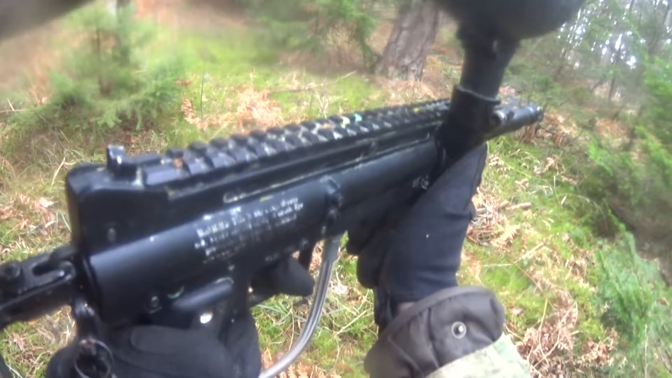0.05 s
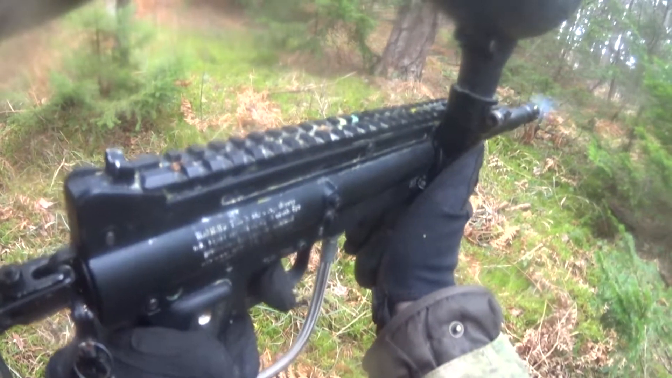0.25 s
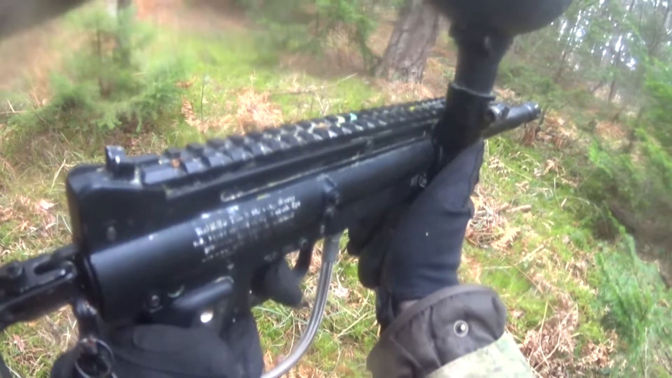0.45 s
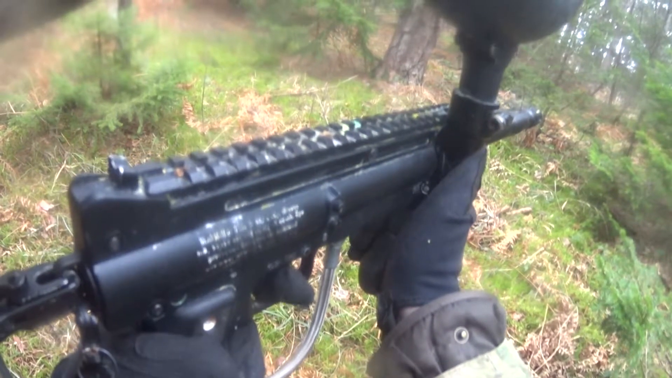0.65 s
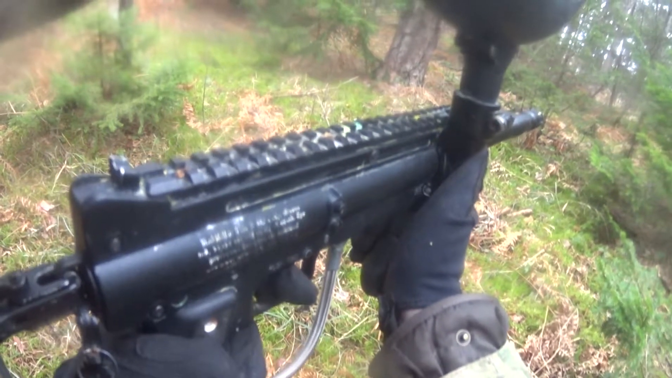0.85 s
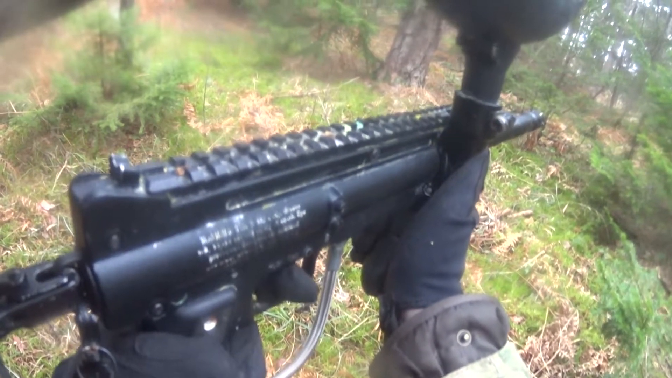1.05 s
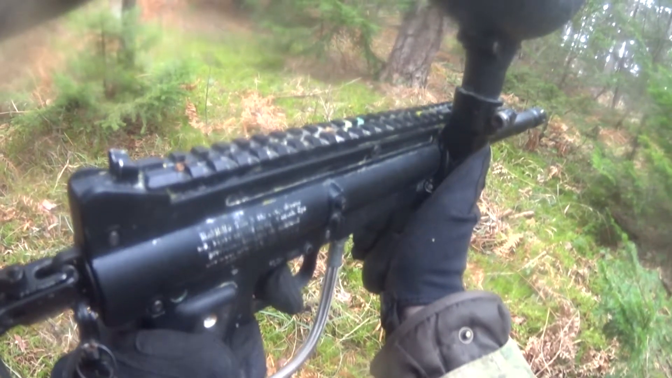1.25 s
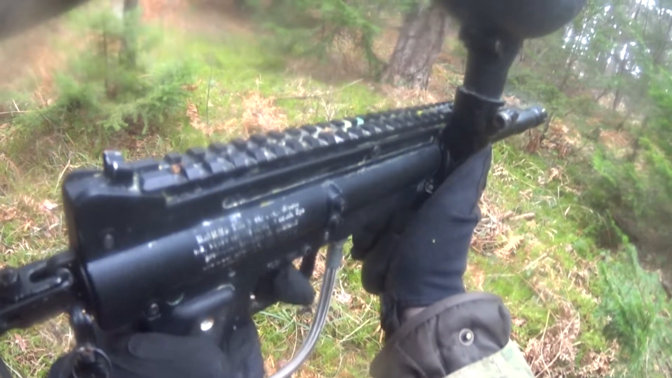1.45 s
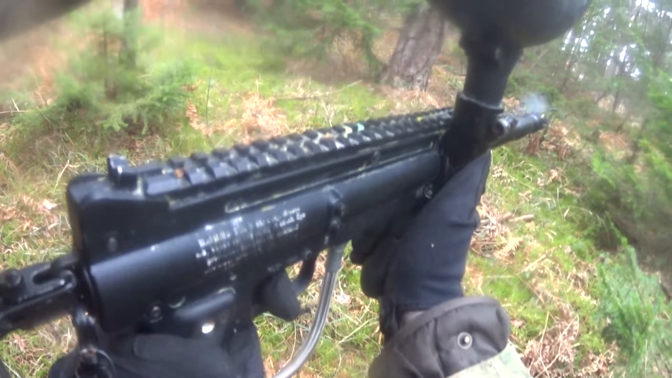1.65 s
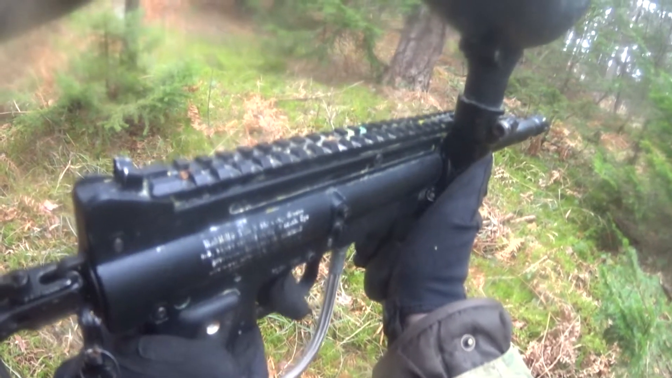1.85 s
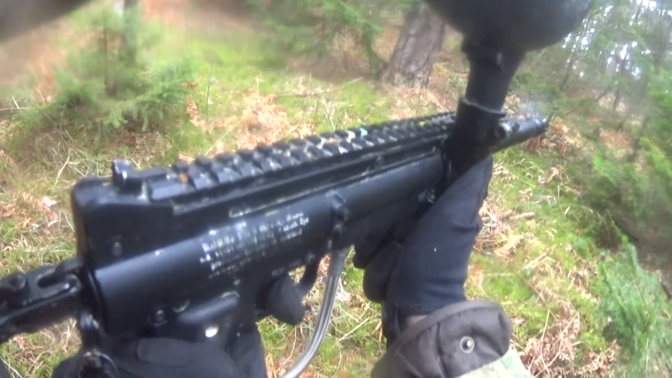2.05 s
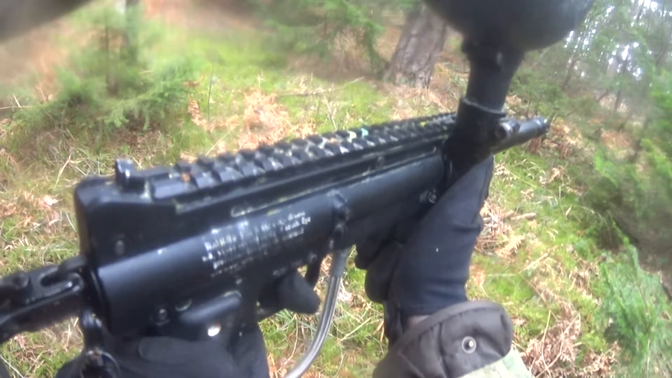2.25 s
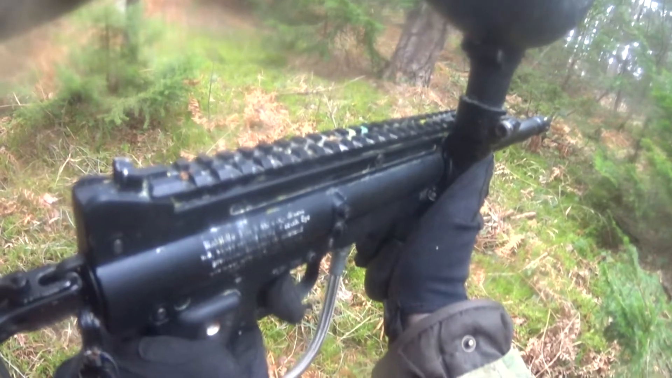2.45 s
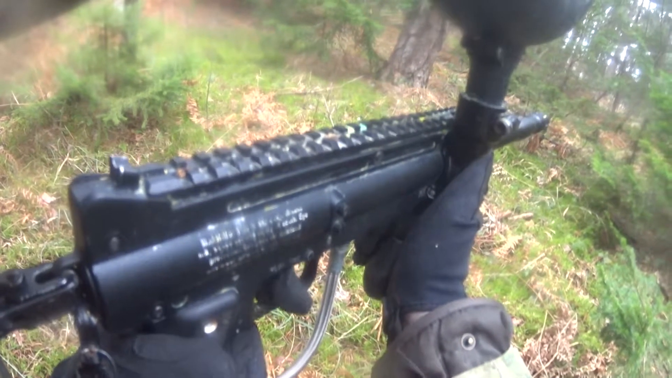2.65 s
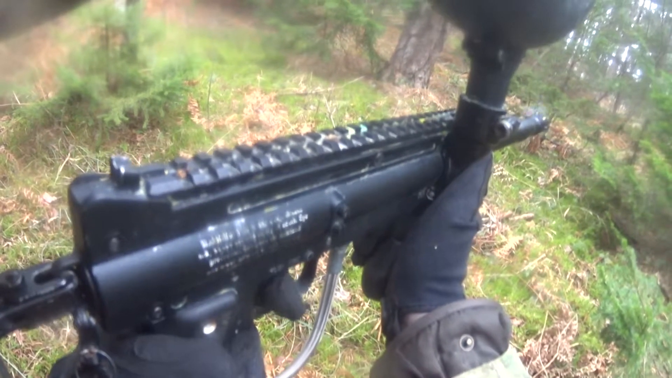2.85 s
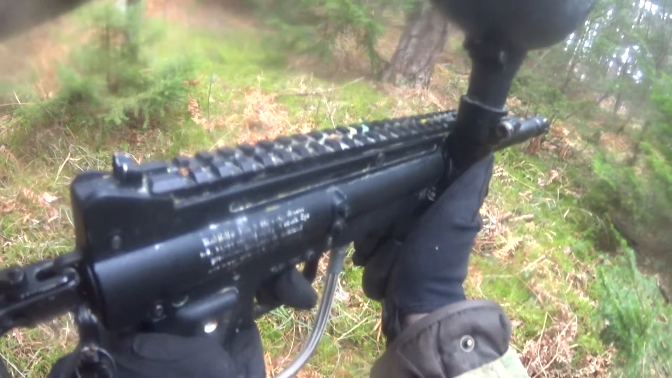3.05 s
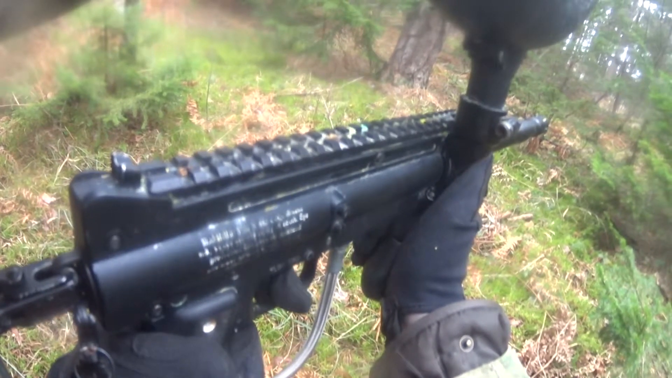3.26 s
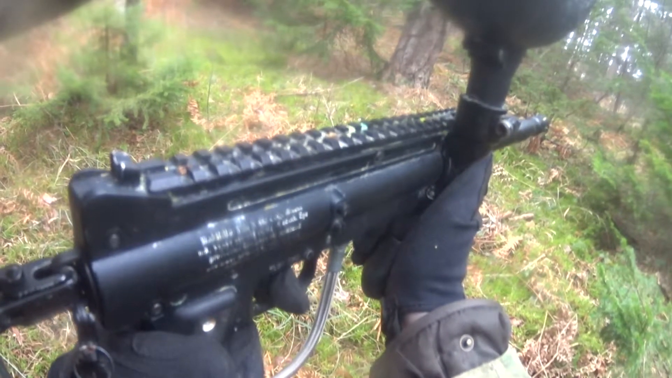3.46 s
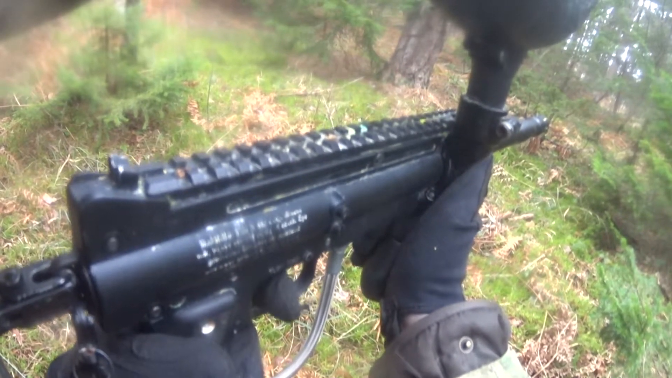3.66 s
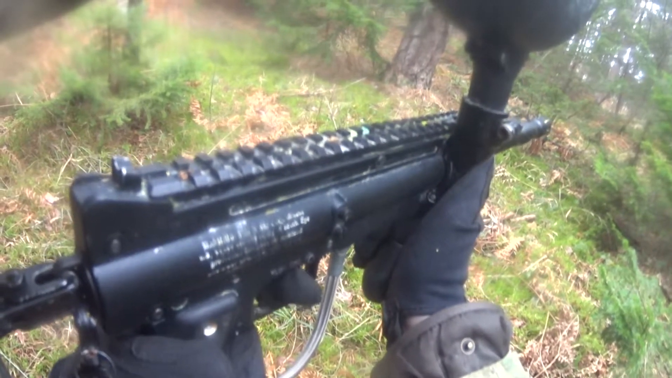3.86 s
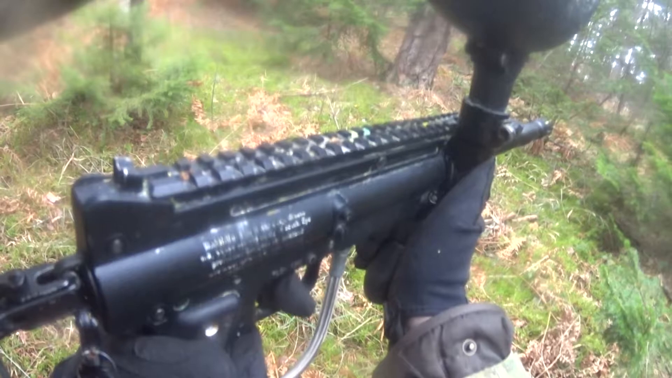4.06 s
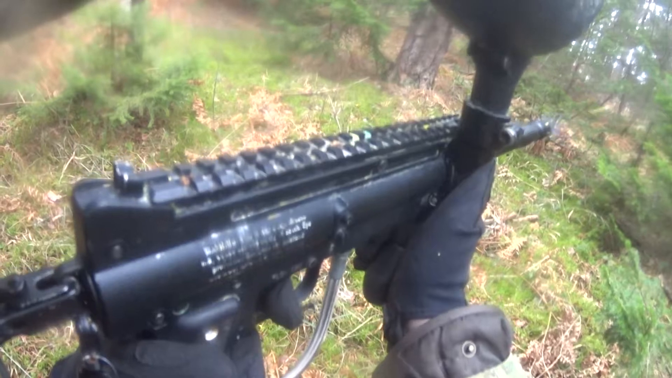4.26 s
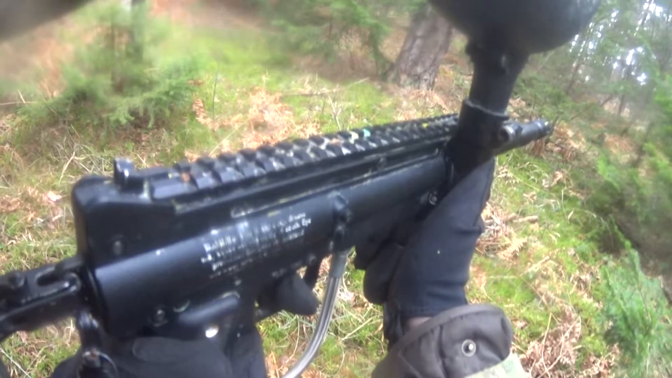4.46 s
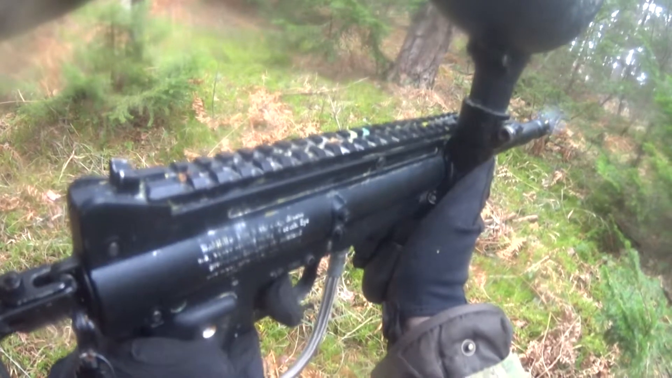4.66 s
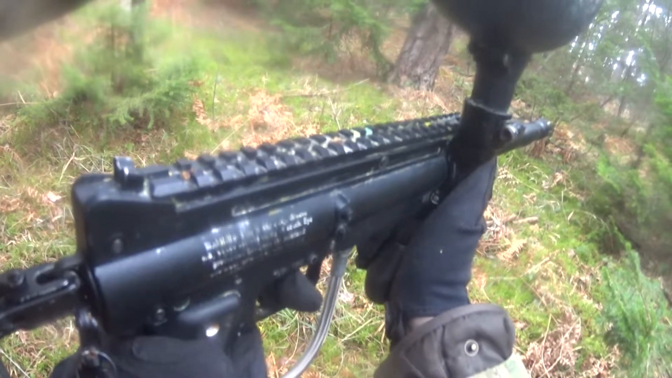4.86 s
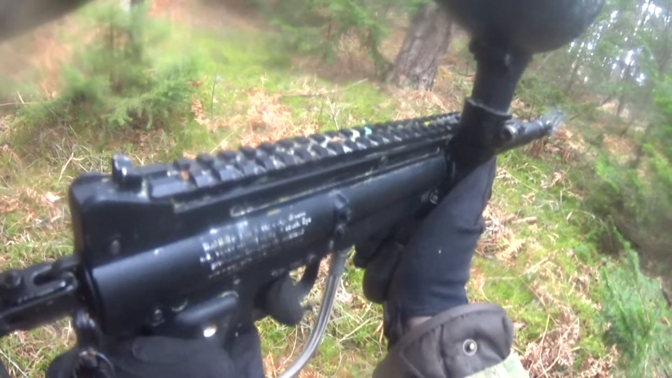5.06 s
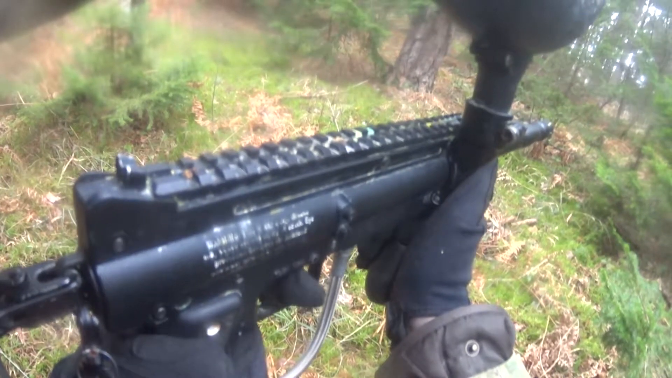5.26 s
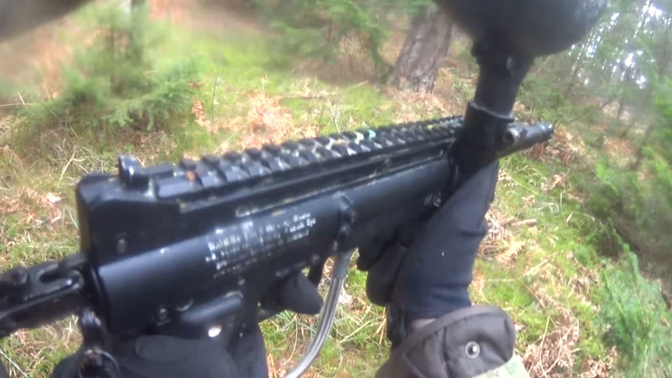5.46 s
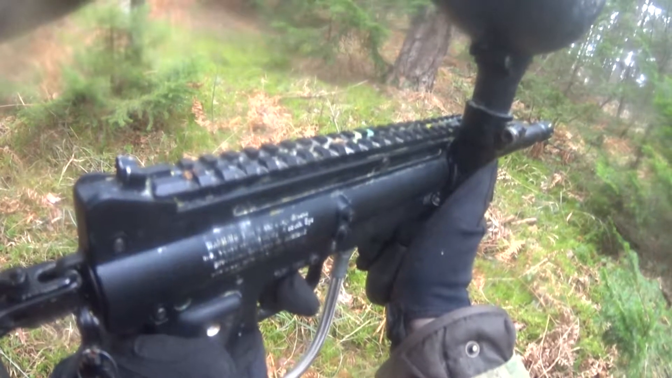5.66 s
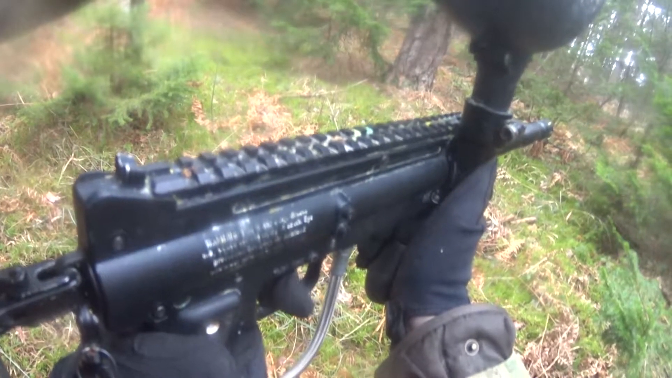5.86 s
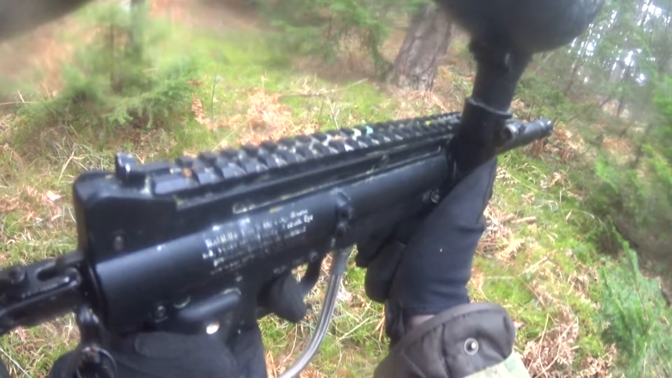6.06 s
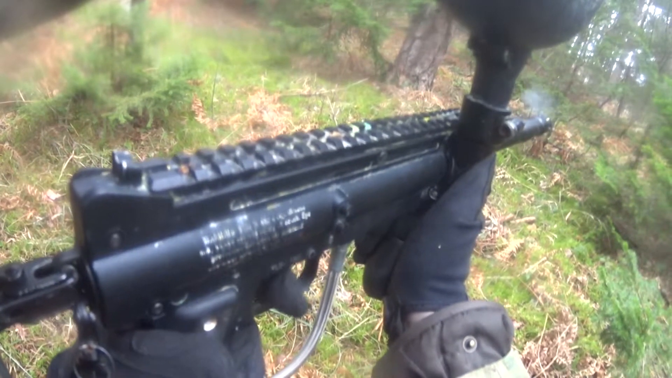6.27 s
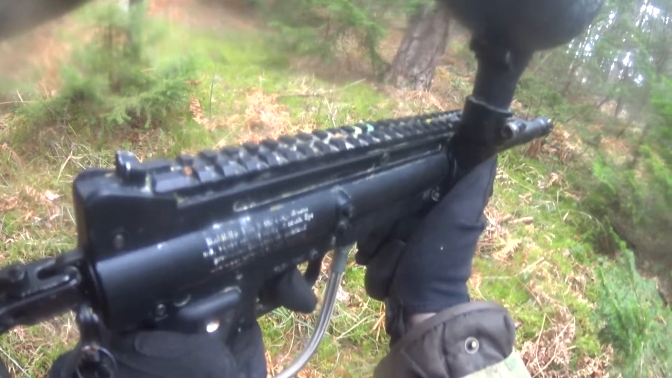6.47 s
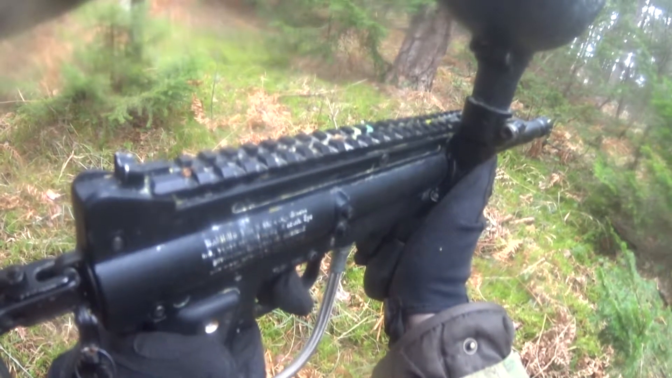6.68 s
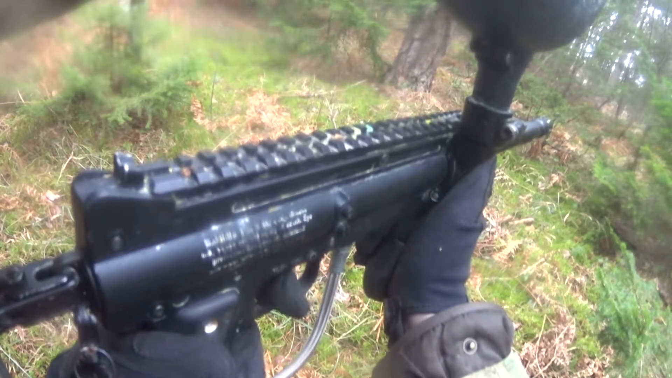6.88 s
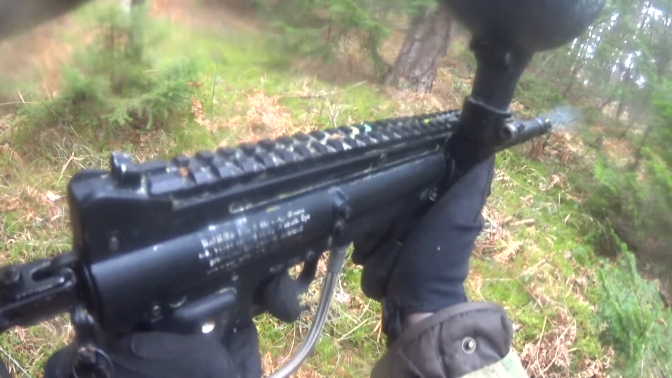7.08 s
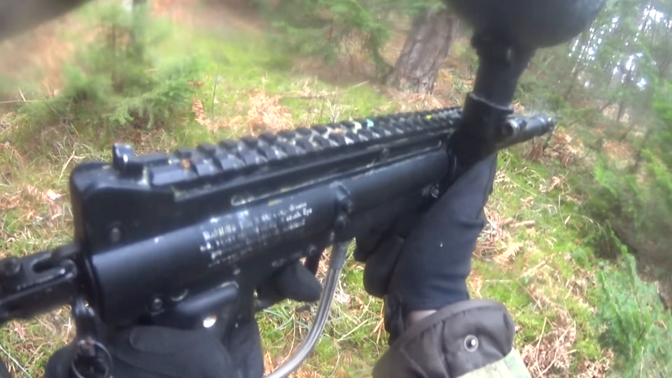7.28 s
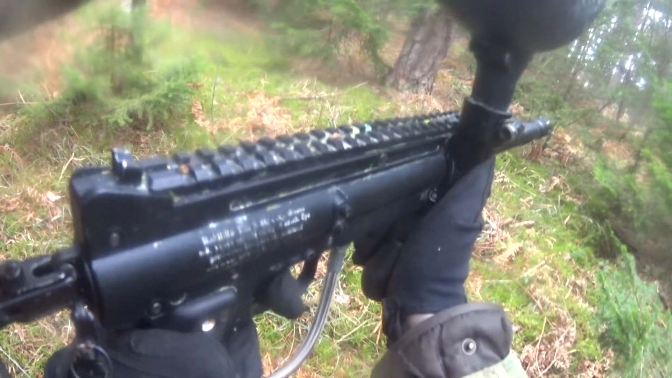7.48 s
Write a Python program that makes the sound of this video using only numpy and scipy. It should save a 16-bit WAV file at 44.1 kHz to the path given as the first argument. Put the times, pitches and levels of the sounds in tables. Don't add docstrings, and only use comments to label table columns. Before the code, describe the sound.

A close paintball marker fires spaced single shots with clicks and hopper rattle while a second marker farther off fires fast even bursts in a forest.

```python
import sys
import numpy as np
from scipy import signal
from scipy.fft import rfft, irfft, next_fast_len
from scipy.io import wavfile
from scipy.ndimage import uniform_filter1d

SR = 44100
rng = np.random.default_rng(int(sys.argv[2]) if len(sys.argv) > 2 else 0)


def to_wav(s):
    ch = np.atleast_2d(s).T
    pcm = np.round(np.clip(ch, -1, 1) * 32767)
    wavfile.write(sys.argv[1], SR, pcm.astype(np.int16))


def linear_from_db(decibels):
    return 10 ** (np.asarray(decibels, float) / 20)


N = 331632
PAD = 4410

# start_s, peak_db, spring_ring_rel_db
RESETS = [(0.099, -8, -27), (0.397, -5.5, -31.5), (0.728, -7, -28), (1.5249, -7.5, -34), (1.7757, -7, -49),
          (2.1914, -6.5, -32), (2.659, -6, -35), (2.9699, -8, -46), (3.8728, -5, -35), (4.4604, -4.5, -36),
          (4.807, -7.5, -31), (5.2455, -4.5, -32), (6.389, -4.5, -30.5), (7.272, -5.5, -28.5)]


def evened(x):
    return x / np.sqrt(np.mean(x ** 2) + 1e-20)


def peaked(x):
    return x / abs(x).max(-1, keepdims=True)


def drift(shape, smooth):
    return evened(uniform_filter1d(rng.standard_normal(shape), size=smooth))


def read(points, hz):
    point_hz, value = np.transpose(points)
    return np.interp(np.log(hz + 1), np.log(point_hz + 1), value)


def noise(colour, size):
    spectrum = rfft(rng.standard_normal((2, size)))
    gain = linear_from_db(read(colour, np.fft.rfftfreq(size, 1 / SR)))
    return evened(irfft(spectrum * gain, size))


def add(mix, start_s, sound):
    part = mix[..., round(start_s * SR) + PAD:][..., :sound.shape[-1]]
    part += sound[..., :part.shape[-1]]


def puff(t, rise_s, t60_s):
    t = np.maximum(t, 0)
    return (1 - np.exp(-t / rise_s)) * linear_from_db(-60 * t / t60_s)


def ring(x, modes):
    return sum(linear_from_db(db) * signal.lfilter(*signal.iirpeak(hz, hz / width_hz, SR), x)
               for hz, width_hz, db in modes)


def column(modes, t, lead_s):
    u, out = np.maximum(t + lead_s, 0), 0
    for hz, db, build_s, length_s in modes:
        envelope = np.tanh(u / build_s) * np.exp(-3.0 * (u / length_s) ** 3)
        out = out + linear_from_db(db) * np.cos(2 * np.pi * hz * t) * envelope
    return out


def blast(db, slap_db):
    # hz, level_db
    gas_colour = [(530, -8), (900, -15), (1020, -9), (1670, -2.5), (2330, -1.5), (2830, -1.5), (3080, -5.5),
                  (5010, -2), (9430, -8), (10900, -2), (15200, -1.5), (15900, 8), (16500, -41)]
    # hz, level_db, build_up_s, boom_length_s
    barrel = [(100, -26, .002, .012), (170, -11, .0068, .0092), (254, -19, .003, .0112),
              (429, -12.5, .0004, .0085), (620, -3, .0068, .0072), (676, -17, .004, .021)]
    t = np.arange(6600) / SR - .006
    surges = 0.84 * puff(t + 0.0048, 0.001, 0.028) + 0.67 * puff(t + 0.0015, 0.00059, 0.044)
    surges += .5 * puff(t - .0065, 0.00058, 0.012) + 0.23 * puff(t, 0.0053, 0.3)
    slap = linear_from_db(slap_db + 4.5) * puff(t - .0115, 0.00043, 0.0096)
    gas = linear_from_db(db - 8.5) * noise(gas_colour, 6600) * (surges + slap)
    port_db = np.array([[0], [-5]])
    return gas - linear_from_db(db + port_db) * column(barrel, t, lead_s=.0008)


def rattle(start_s, stop_s, db, sag_db, boom_db, tumble_s):
    # hz, width_hz, level_db
    shell_modes = [(1088, 42, 3), (1170, 110, -2), (1406, 310, -1), (1675, 150, 6.5), (1900, 480, -16),
                   (2280, 57, 3), (2840, 33, 2.5)]
    # hz, width_hz, level_db
    body_modes = [(287, 240, -2.5), (510, 126, 8.5), (594, 43, -8), (618, 47, 7.5), (710, 41, -17)]
    # hz, level_db
    fizz_colour = [(1880, -19), (3200, -8), (7290, -3.5), (8140, -6), (8900, -6), (9660, -13), (13200, -15),
                   (14900, -12), (15800, -30), (16500, -52)]
    rise_s, halt_s, halt_db = .006, 0.019, -7
    t = np.arange(start_s - rise_s, stop_s, 1 / SR)
    shape = (2, len(t))
    progress = (t - start_s) / (stop_s - start_s)
    halt = np.clip(1 - (stop_s - t) / halt_s, 0, 1)
    level_db = db - sag_db * progress + halt_db * halt
    tumble_db = 2.5 * np.exp(-((t - tumble_s) / 0.016) ** 2)

    clumps = linear_from_db(3.0 * drift(len(t), 220))
    knock_db = 3.0 * np.minimum(rng.exponential(1, len(t)), 3)
    struck = rng.random(len(t)) < 3000 / SR
    knocks = rng.standard_normal(shape) * linear_from_db(knock_db) * struck
    drive = clumps * (evened(knocks) + .5 * rng.standard_normal(shape))

    free = [(hz, width_hz, mode_db + 2.8 * rng.standard_normal()) for hz, width_hz, mode_db in shell_modes]
    shifts = linear_from_db(2 * drift((len(free), len(t)), 700))
    shell = sum(ring(drive * shift, [mode]) for shift, mode in zip(shifts, free))
    body = ring(drive / clumps, body_modes)
    fizz = noise(fizz_colour, len(t)) * clumps ** 1.9

    parts = evened(shell) + linear_from_db(boom_db + 3 * progress) * evened(body)
    parts = linear_from_db(tumble_db) * parts + linear_from_db(-0.5 - 70 * (t - start_s)) * evened(fizz)
    return t[0], linear_from_db(level_db) * parts * np.minimum((t - t[0]) / rise_s, 1)


def hush():
    # time_s, level_db
    levels = [(0.0, -40.5), (0.35, -37.5), (0.92, -38), (2.2, -39.5), (3.06, -38), (3.3, -41), (3.5, -39),
              (3.77, -34.5), (4.25, -36.5), (4.42, -41.5), (5.36, -44), (6.07, -45), (6.43, -42.5),
              (7.52, -44.5)]
    # hz, level_db
    hush_colour = [(20, -13), (60, -31.5), (170, -12.5), (330, -8.5), (460, -6.5), (540, -1.5), (700, -0.5),
                   (930, -19.5), (2100, -14.5), (3000, -26.5), (6450, -29.5), (6800, -24.5), (7150, -34),
                   (15800, -30.5)]
    time_s, db = np.transpose(levels)
    patches_db = 1.04 * drift(N, 2500)
    wash = noise(hush_colour, next_fast_len(N))[:, :N]
    return wash * linear_from_db(np.interp(np.arange(N) / SR, time_s, db) + patches_db)


def wind():
    lumps = np.clip(drift(N, 3000), -2, 1)
    colour = [(20, -5.0), (50, 2.5), (100, -4.5), (180, -8.5), (400, -47), (20000, -95.5)]
    low = noise(colour, next_fast_len(N))[:, :N]
    return linear_from_db(-57) * low * linear_from_db(6.1 * lumps)


def trees(x):
    # hz, level_db
    echo_colour = [(60, -28), (200, -13.5), (620, -6), (950, 0), (2000, 2.5), (3400, -1.5), (5000, -5.5),
                   (7000, -4.5), (11000, -20), (16000, -43)]
    t = np.arange(SR) / SR
    low = noise(echo_colour, SR) * puff(t - .012, 0.022, 0.47)
    high = np.diff(noise(echo_colour, SR + 1)) * puff(t - .008, 0.0088, 0.48)
    tail = low / np.linalg.norm(low[0]) + 0.57 * high / np.linalg.norm(high[0])
    return signal.fftconvolve(x[None], tail, axes=1)[:, :len(x)]


def reset(db, spring_db):
    # hz, level_db
    reset_colour = [(880, -40), (1500, -24), (2740, -20), (3500, -22), (4340, -13), (6360, -11),
                    (9310, -13), (11400, 3), (15100, -14), (16500, -12)]
    t = np.arange(1800) / SR - .001
    tick = noise(reset_colour, 1800) * (puff(t, .00005, .003) + 0.11 * puff(t, 0.00032, 0.015))
    spring = linear_from_db(spring_db) * np.sin(2 * np.pi * 2800 * t) * puff(t, 0.0011, 0.044)
    return linear_from_db(db + 9.5) * (peaked(tick) + spring)


def ducking():
    dip_db, dip_s = -7.5, 0.023
    t = np.arange(N) / SR
    return linear_from_db(sum(dip_db * np.exp(-((t - start_s - dip_s / 2) / dip_s * 2) ** 2)
                   for start_s, *_ in RESETS))


def far_shot(db):
    # hz, level_db
    far_gas_colour = [(1000, -15), (1500, -6), (2200, -1), (3300, -9), (4400, -3), (5100, 4), (5800, -4),
                      (7500, -14), (16000, -36)]
    # hz, level_db, build_up_s, boom_length_s
    far_barrel = [(120, -14, .004, .016), (290, -11, .0006, .0047), (555, -1, .0025, .004),
                  (650, -9, .001, .010)]
    t = np.arange(1500) / SR - .0006
    gas = puff(t, 0.0003, 0.034) + .5 * puff(t - .0105, 0.00017, 0.021)
    out = linear_from_db(-8.0) * noise(far_gas_colour, 1500) * gas
    out += column(far_barrel, t, lead_s=.0004)
    out += .2 * column(far_barrel, t - .012, lead_s=.0004)
    return linear_from_db(db) * out


def sear(db):
    # hz, level_db
    sear_colour = [(180, -29), (300, -2.5), (682, -0.5), (1150, -11.5), (2400, 2), (3030, -3.5),
                   (3470, -11), (6030, 5.5), (9020, -4), (15200, -1), (16500, -25)]
    # hz, width_hz, level_db
    steel_modes = [(2160, 140, -38), (3535, 98, 21), (4320, 270, 8.5), (5370, 80, -21), (7500, 220, -13),
                   (7740, 280, 2), (10700, 330, 10)]
    t = np.arange(1100) / SR
    shape = puff(t, 0.00013, 0.024) + 0.49 * puff(t - .0032, 0.0003, 0.0072) + 0.1 * puff(t, 0.0035, 0.37)
    scrape = noise(sear_colour, 1100) * shape * (t < .021)
    return linear_from_db(db - 1.5) * peaked(scrape + 0.88 * ring(scrape, steel_modes))


def splat(db, hz, echo_share):
    t = np.arange(22000) / SR
    colour = [(90, -12), (250, -12), (650, -9), (950, -20), (hz / 1.19, -6), (hz, 4), (hz * 1.064, -6),
              (7500, -13), (10000, -28), (17000, -40)]
    crack = noise(colour, 22000) * puff(t, 0.00055, 0.016)
    burst = peaked(crack + .4 * ring(crack, [(hz, 320, 6)]))
    diffuse = echo_share * 0.14 * noise(colour, 22000) * puff(t - .004, 0.0018, 0.6)
    return linear_from_db(db - 5.0) * (burst + diffuse)


def hand_bump(db, hz):
    t = np.arange(2600) / SR
    return linear_from_db(db) * np.sin(2 * np.pi * hz * t) * np.hanning(len(t))


def scene():
    # start_s, strength_db, bolt_slap_db
    blasts = [(-.017, 0, 8), (0.3036, 1, -7), (0.608, 0.5, -2), (1.3969, 1, 3), (1.673, 1, -4.5),
              (2.0479, 2, -8), (2.5303, -0.5, 3.5), (2.8613, 0, 4.5), (3.739, 0.5, 1.5), (4.318, 1, -5.5),
              (4.6904, 2, 0), (5.1164, 0.5, 3), (6.2374, -0.5, 0), (7.1244, 1, 0)]
    # start_s, knocking_db, sag_db, body_boom_rel_db, tumble_s
    rattles = [(0.0, -30.5, 3.5, -1, .092), (.322, -28.5, 3, -1.5, .388), (.627, -27, 13.5, -3.5, .677),
               (1.417, -28, 10.5, 0, 1.442), (1.692, -27, 8.5, -2.5, 1.76), (2.068, -30, 7, 1, 2.094),
               (2.55, -27, 6, -1.5, 2.598), (2.88, -26.5, 6, -3, 2.944), (3.758, -25.5, 9.5, 0, 3.862),
               (4.337, -26.5, 7.5, 1, 4.407), (4.71, -28.5, 4.5, 2.5, 4.79),
               (5.136, -26.5, 6.5, -0.5, 5.208), (6.257, -24, 15, -0.5, 6.287),
               (7.143, -25.5, 11, -2, 7.201)]
    # start_s, length_s, knocking_db, body_boom_rel_db
    scuffs = [
        (0.742, 0.048, -40, -17),
        (2.201, 0.084, -34, -6),
        (3.077, .055, -34.5, -4),
        (5.257, 0.086, -50, 8.5),
    ]
    # start_s, peak_db
    far_singles = [(0.143, -24), (0.273, -24.5), (3.434, -19.5), (3.503, -22.5), (3.602, -19), (3.672, -23),
                   (3.763, -21.5), (3.904, -22), (3.974, -25), (4.049, -20.5), (4.117, -24), (4.184, -21.5),
                   (4.251, -23.5)]
    # start_s, peak_db
    sears = [(0.2801, 0), (0.5847, -3), (1.3745, -2.5), (1.65, -3), (2.0258, -1), (2.5078, -3),
             (2.8385, -2.5), (3.716, -2.5), (4.2948, -2), (4.6677, 0), (5.0932, -1.5), (6.2146, 0.5),
             (7.1012, -2)]
    # start_s, peak_db, centre_hz, echo_share
    splats = [(0.9844, -14, 2280, 0.52), (1.252, -6.5, 2430, 0.41), (1.633, -21, 6310, 0.3),
              (1.9492, -20, 1900, 0.71), (2.1685, -10.5, 2100, 0.29), (2.2106, -7.5, 2310, 0.26),
              (2.2959, -13.5, 2410, 0.5), (2.9354, -17, 1620, 0.33), (3.0088, -16.5, 2300, 0.95),
              (3.082, -26, 2370, 0.26), (3.2723, -16.5, 2230, 0.57), (3.546, -15, 4660, 0.48),
              (3.867, -2.5, 2400, 0.35), (3.889, -7, 2060, 0.44), (3.9462, -16.5, 2080, 0.37),
              (4.1086, -10.5, 2360, 0.59), (4.152, -16.5, 4340, 0.46), (4.405, -8.5, 2280, 0.25),
              (4.4297, -13, 1700, 0.17), (4.8414, -16, 2110, 0.49), (4.9302, -19, 3230, 0.36),
              (5.2859, -25, 1950, 0.43), (5.561, -23, 2070, 1), (5.561, -17, 3780, 0.31),
              (6.347, -24, 1720, 0.32), (6.6017, -14.5, 3130, 0.45), (7.0194, -38, 1510, 0.4),
              (7.244, -14.5, 1220, 0.2)]

    near, far, trunks = np.zeros((3, 2, N + PAD))
    for start_s, db, slap_db in blasts:
        add(near, start_s - .006, blast(db, slap_db))
    for (start_s, db, sag_db, boom_db, tumble_s), (stop_s, *_) in zip(rattles, RESETS):
        add(near, *rattle(start_s, stop_s, db, sag_db, boom_db, tumble_s))
    for start_s, length_s, db, boom_db in scuffs:
        add(near, *rattle(start_s, start_s + length_s, db - 2.5, 0, boom_db, start_s + length_s / 2))
    for start_s, db, spring_db in RESETS:
        add(near, start_s, reset(db, spring_db))

    for start_s, db in far_singles:
        add(far, start_s, far_shot(db + 4.5))
    for k in range(44):
        add(far, .4362 + k * .06658, far_shot(-19.5 + rng.normal(0, 0.61)))

    for start_s, db in sears:
        add(near, start_s, sear(db))
    for start_s, db, hz, echo_share in splats:
        add(trunks, start_s, splat(db, hz, echo_share))
    add(near[0], 5.415, hand_bump(-42, 120))
    for start_s in (5.57, 6.61, 6.75):
        add(near[0], start_s, hand_bump(-47.5, 150))

    echo = trees(linear_from_db(-11) * far[0] + linear_from_db(-23.5) * near[0])
    background = (far + trunks + echo)[:, PAD:] + hush() + wind()
    return near[:, PAD:] + ducking() * background


def roll_off(x):
    return signal.sosfilt(signal.butter(12, 16980, fs=SR, output="sos"), x)


def record(dry):
    # hz, likeness
    likeness = [(30, .98), (70, .92), (150, .993), (330, .975), (700, .985), (1170, .86), (1800, .78),
                (2740, .3), (4200, .6), (6400, .45), (9800, -.15), (15000, -.7)]
    # hz, left_minus_right_db
    balance = [(60, -1.5), (150, -0.3), (380, 0.0), (950, 0.9), (2380, 1.9), (5980, 1.2), (15000, -0.5)]
    size = next_fast_len(N + 4096)
    hz = np.fft.rfftfreq(size, 1 / SR)
    a, b = rfft(dry, size)
    same, tilt = read(likeness, hz), linear_from_db(read(balance, hz) / 2)
    left = a * tilt
    right = (same * a + 1j * np.sqrt(1 - same ** 2) * b) / tilt
    edge = 1 / (1 + (hz / 15900) ** 80) / (1 + (45 / (hz + 1)) ** 2)
    pair = irfft(edge * np.array([left, right]), size)[:, :N]
    pair = 0.97 * np.tanh(pair / 1.03)
    return roll_off(pair)


dry = scene()
out = record(dry)
to_wav(out)
```